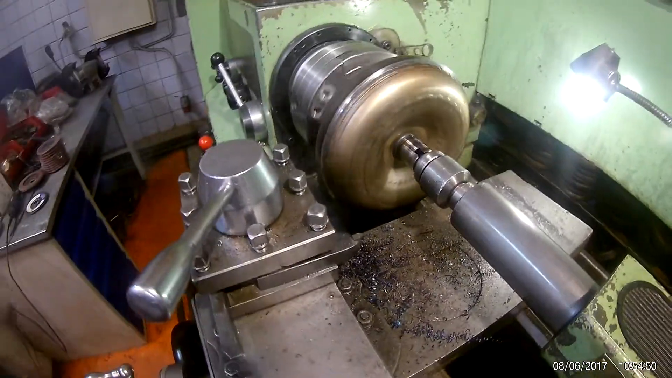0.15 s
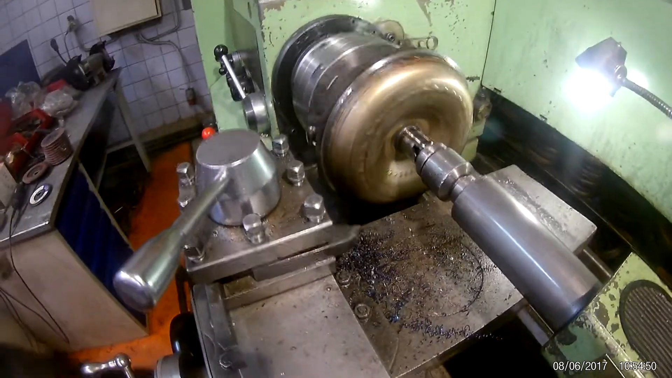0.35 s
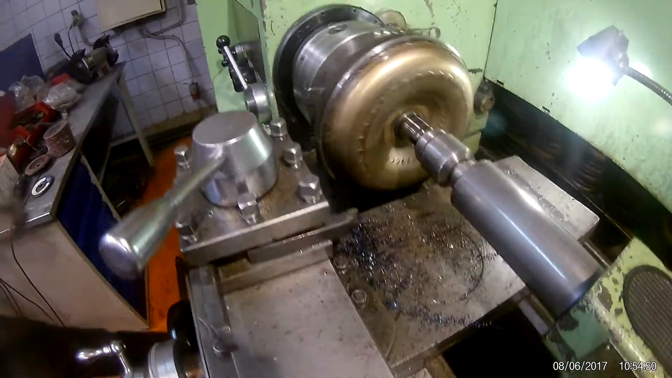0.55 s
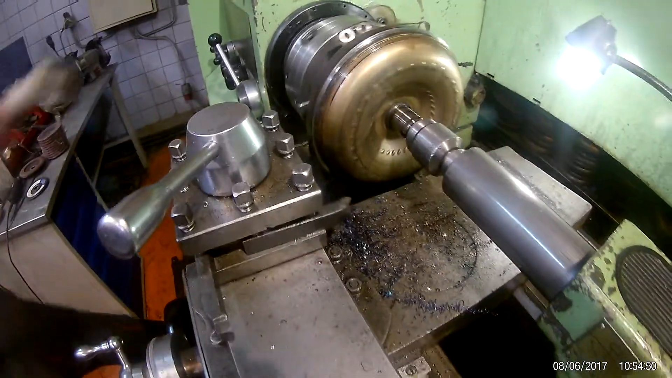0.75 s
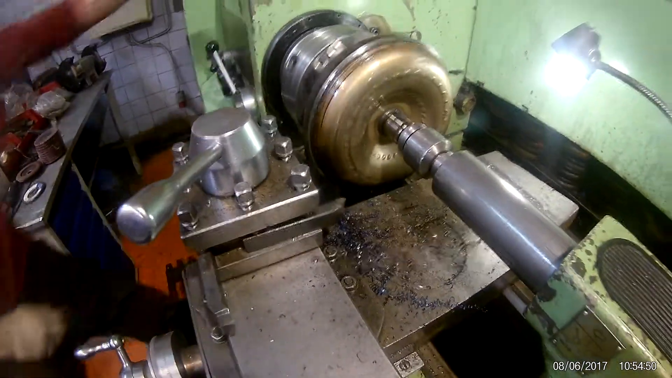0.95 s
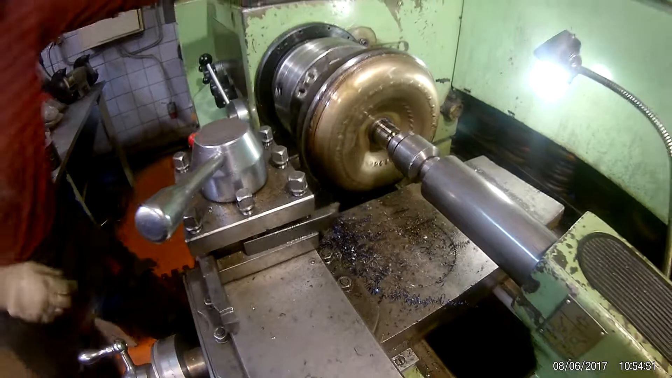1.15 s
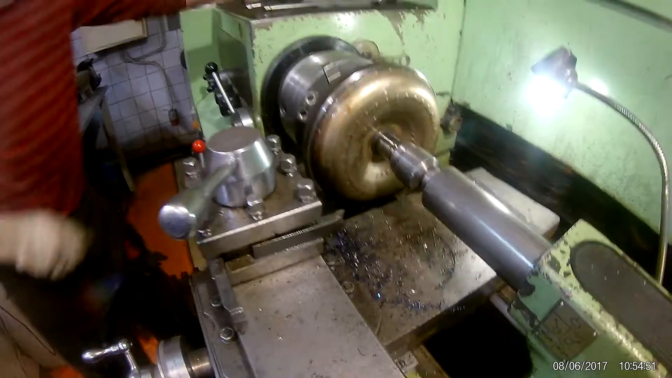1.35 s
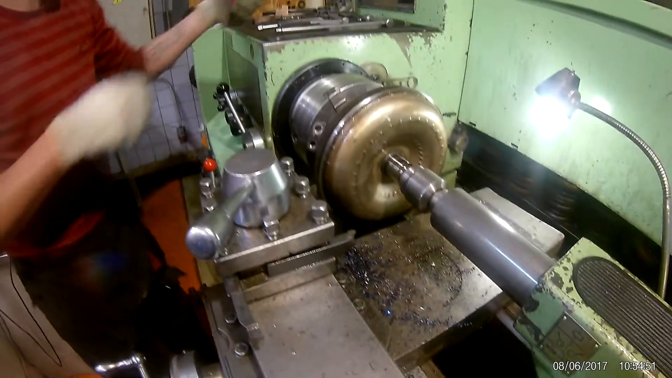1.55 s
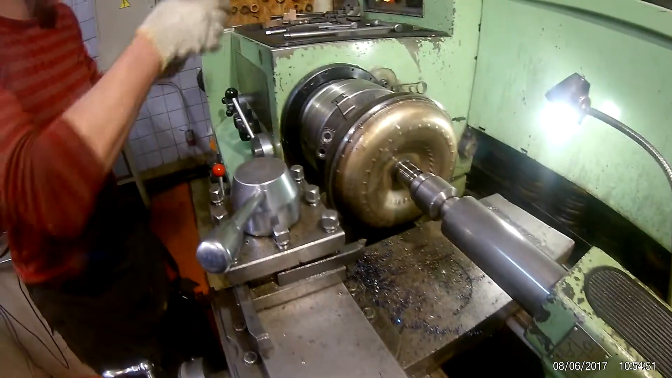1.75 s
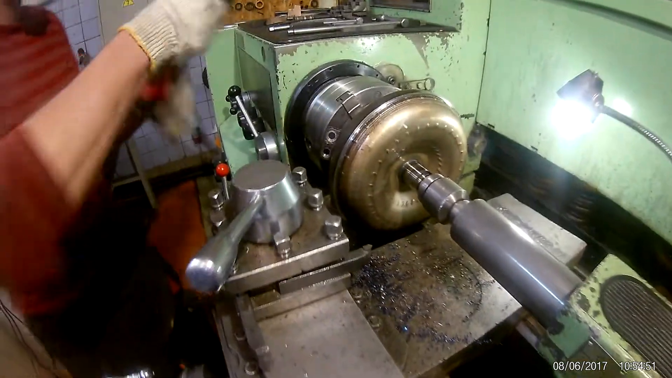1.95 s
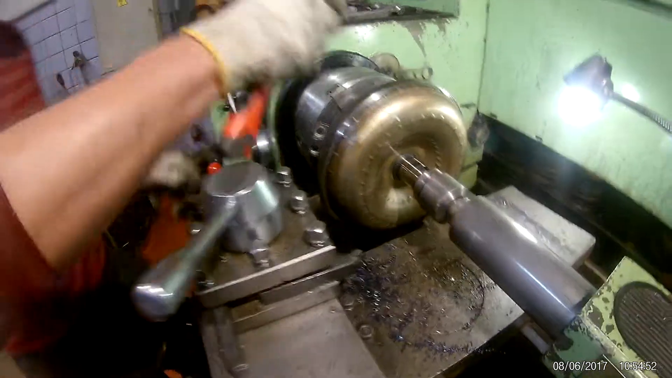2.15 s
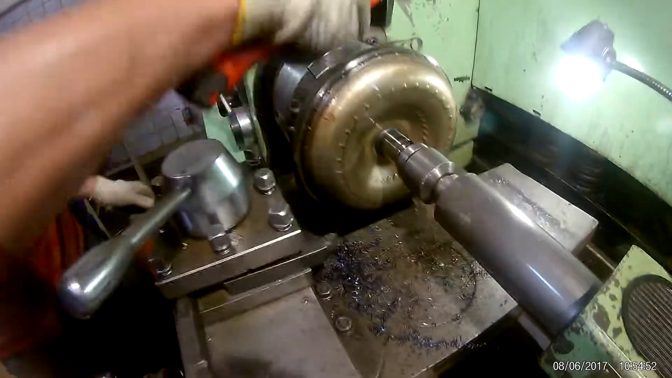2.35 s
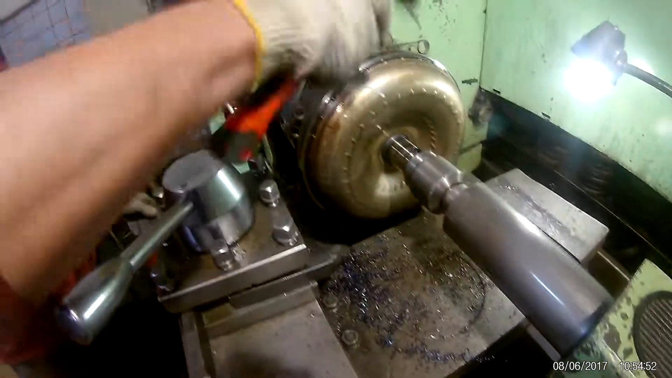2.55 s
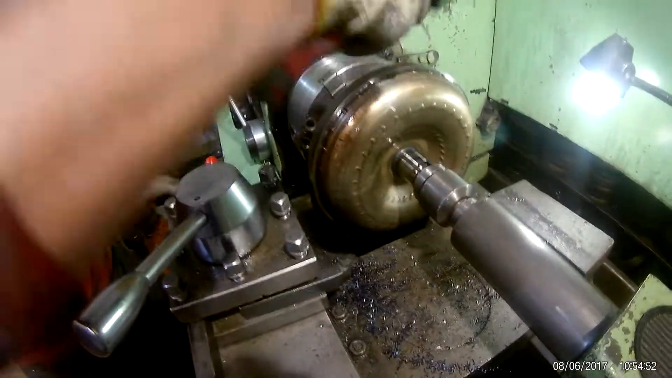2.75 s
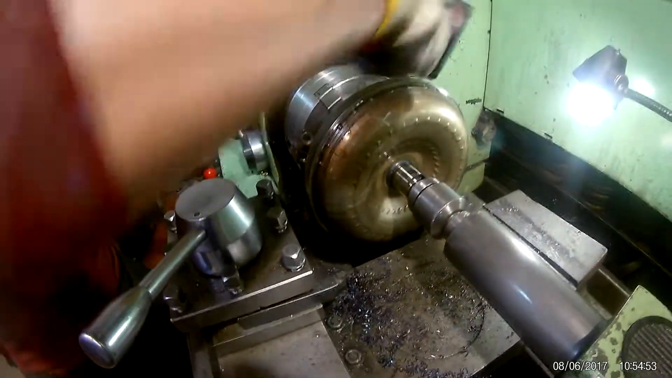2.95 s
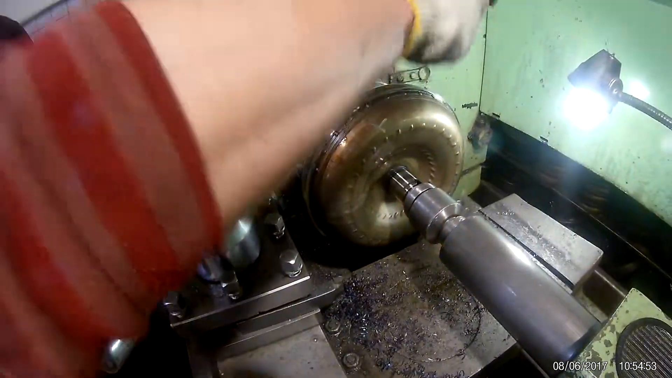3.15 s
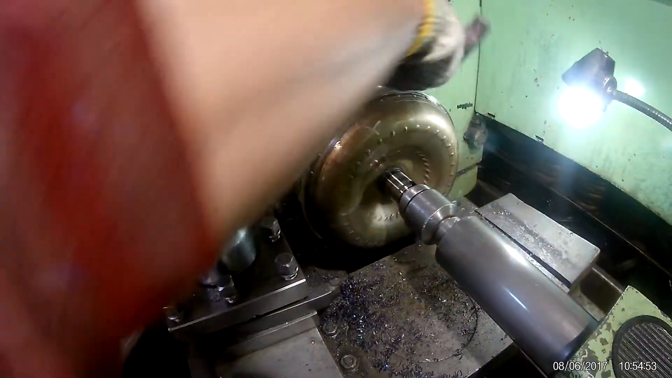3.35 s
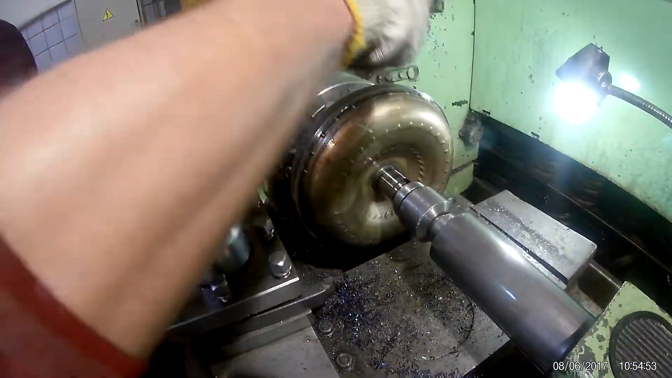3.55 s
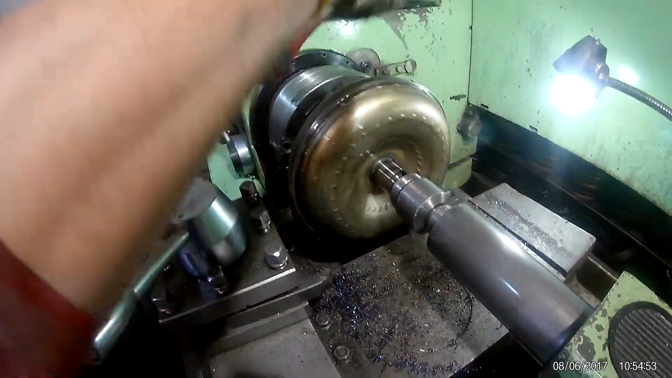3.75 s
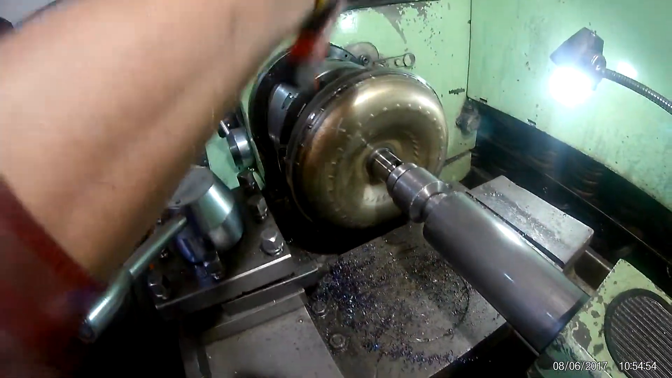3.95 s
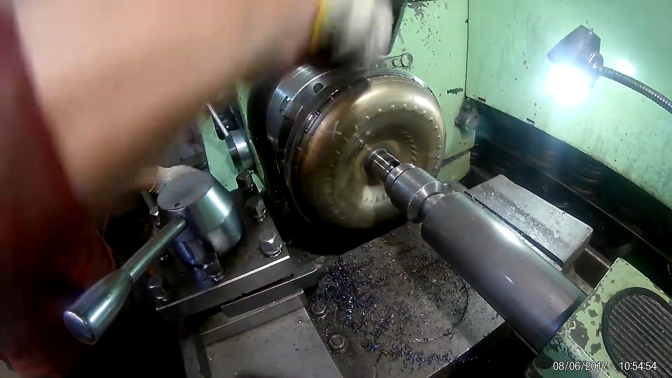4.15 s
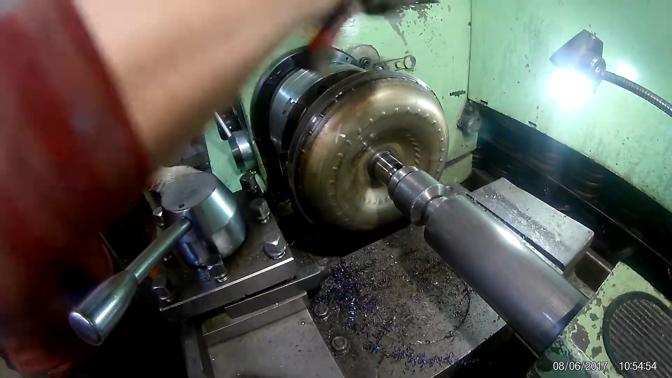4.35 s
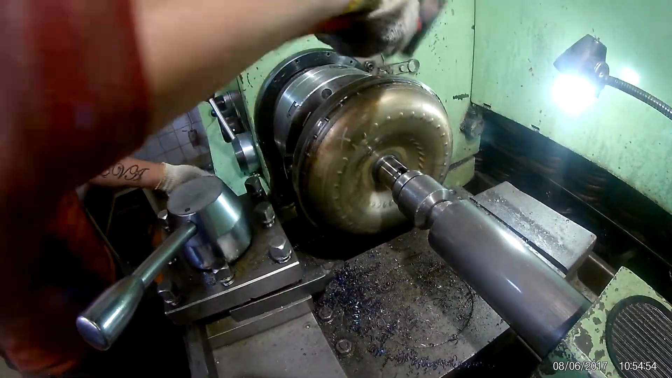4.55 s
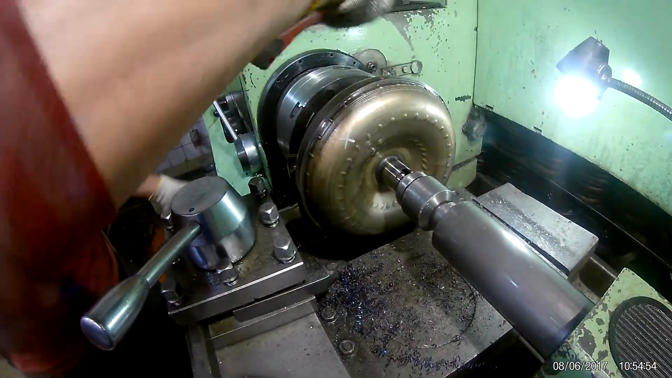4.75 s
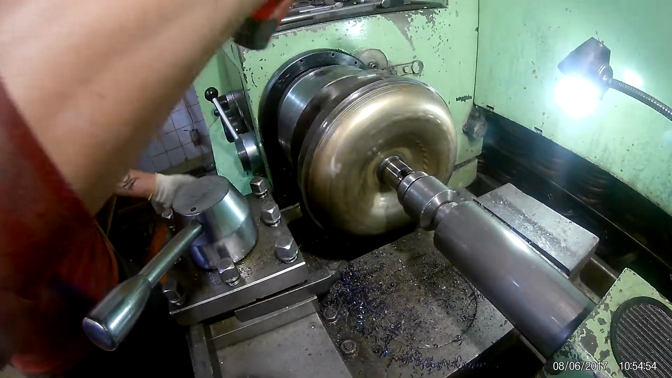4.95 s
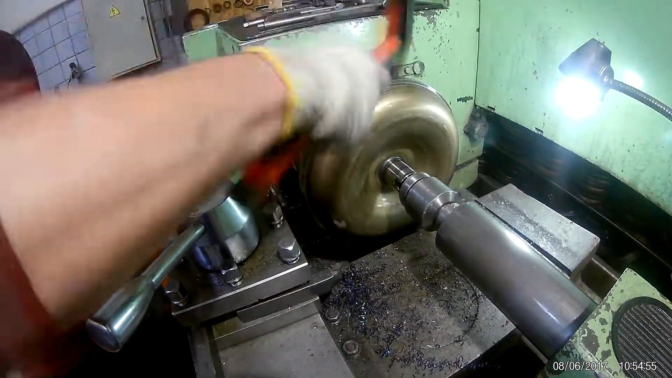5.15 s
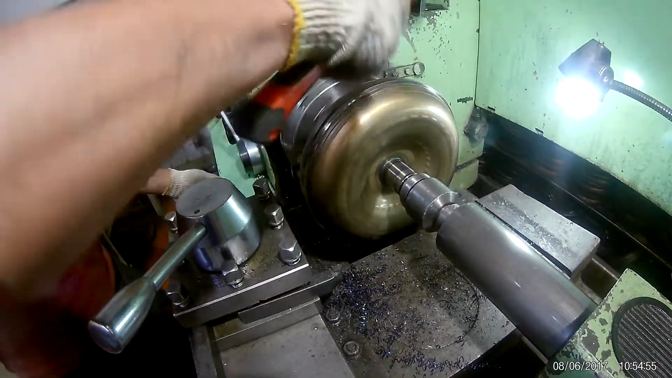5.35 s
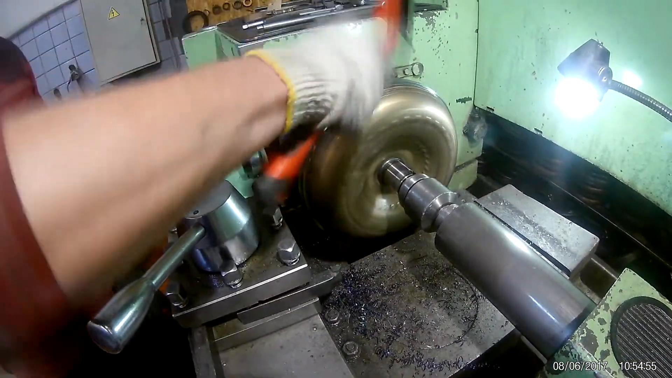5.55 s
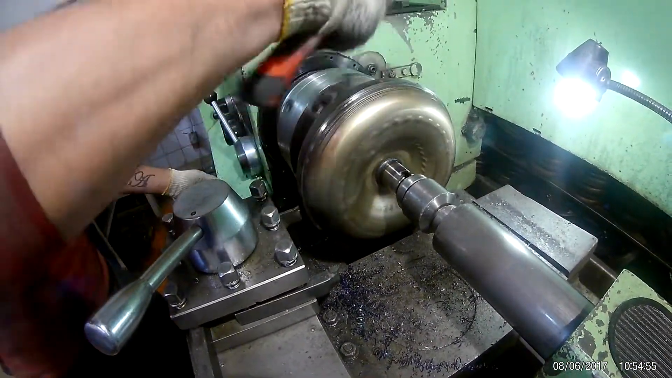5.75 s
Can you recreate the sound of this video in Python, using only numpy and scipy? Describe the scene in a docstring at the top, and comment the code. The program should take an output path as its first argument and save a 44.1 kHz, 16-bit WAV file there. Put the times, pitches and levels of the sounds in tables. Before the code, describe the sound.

Eight loud hammer blows clang on a steel shell, four and then two pairs, over the drone of a running lathe.

```python
"""A metal lathe runs in a small workshop, its gears whining over a rough drone.
A draught brushes the microphone as someone steps up, and tools and loose parts knock lightly.
Then eight hammer blows land on the steel shell that turns in the lathe's chuck (its clamp).
Each blow cracks and sets shell, lathe and room ringing, and the small, close microphone overloads."""
import sys
import numpy as np
from scipy import signal
from scipy.fft import rfft, irfft
from scipy.io import wavfile

SR = 44100
rng = np.random.default_rng(int(sys.argv[2]) if len(sys.argv) > 2 else 0)


def output_pcm(signal):
    """Save a mono or channel-first signal as 16-bit PCM at the path in sys.argv[1].

    Samples are clipped to [-1, 1] before scaling.
    """
    pcm = np.clip(np.atleast_2d(signal).T, -1, 1) * 32767
    wavfile.write(sys.argv[1], SR, np.round(pcm).astype(np.int16))


N = 255339
TIME = np.arange(N) / SR


def undb(db):
    """Turn decibels into a number to multiply by."""
    return 10 ** (np.asarray(db) / 20)


def unit(x):
    """Scale a signal to an average (rms) level of 1."""
    return x / np.sqrt(np.mean(x ** 2))


def along(points, hz):
    """Read between (Hz, value) points, giving each octave equal space."""
    f, value = np.transpose(points)
    return np.interp(np.log(np.maximum(hz, 1)), np.log(f), value)


def noise(points, size=N):
    """Noise of level 1, its lows and highs shaped by (Hz, dB) points."""
    hz = np.fft.rfftfreq(size, 1 / SR)
    return unit(irfft(rfft(rng.standard_normal(size)) * undb(along(points, hz)), size))


def colour(x, points, size=1024):
    """Turn the lows and highs of x up or down by (Hz, dB) points."""
    cepstrum = irfft(np.log(undb(along(points, np.fft.rfftfreq(size, 1 / SR)))))
    # folding makes the filter ring after a sound, never before it
    cepstrum[1:size // 2] *= 2
    cepstrum[size // 2 + 1:] = 0
    return signal.fftconvolve(x, irfft(np.exp(rfft(cepstrum))))[:len(x)]


def wander(rate_hz, size=N):
    """A smooth random wobble, typically 1 away from zero."""
    hz = np.fft.rfftfreq(size, 1 / SR)
    return unit(irfft(rfft(rng.standard_normal(size)) * np.exp(-(hz / rate_hz) ** 2), size))


def fade(t, fade_s):
    """Die away by 60 dB in fade_s seconds, the fade time."""
    return np.exp(-np.log(1000) * t / fade_s)


def add(out, start_s, x):
    """Mix x into out from start_s on."""
    i = int(start_s * SR)
    out[i:i + len(x)] += x[:N - i]


def machine_tone(hz, db, flutter, clock, flutter_hz=9):
    """A tone that follows the lathe's speed; uneven teeth shake its level and pitch."""
    shake = 1 + flutter * (wander(flutter_hz) + 1j * wander(flutter_hz)) / np.sqrt(2)
    return undb(db) * unit(np.real(shake * np.exp(2j * np.pi * hz * clock)))


# The drone's lows and highs. Each row: frequency in Hz, relative level in dB.
DRONE_COLOUR = [(20, -5), (85, -9), (120, -0.5), (170, 3.5), (230, -3.5), (420, -1.5), (520, 1.5),
                (640, -0.5), (780, 7), (900, 0), (1150, -15), (2100, -18.5), (4000, -23), (7000, -32.5)]

def drone(level_db=-31, throb_db=-0.5, throb_hz=25):
    """Bearings, belt and gear oil make a rough noise that throbs a little."""
    return noise(DRONE_COLOUR) * undb(level_db + throb_db * wander(throb_hz))


# Gear tones. Each row: multiple of the rate at which teeth meet, level in dB, amount of flutter.
GEAR_TONES = [(1, -33.5, 0.11), (3, -39, 0.93), (4, -50, .5)]

def gears(clock, teeth_hz=261.1, turns_per_s=7.9, whine_db=-40, swell_at_s=1.5, swell_db=7.5):
    """Meeting teeth hum; a whine at twice their rate swells once."""
    hum = sum(machine_tone(round(k) * teeth_hz, db, flutter, clock) for k, db, flutter in GEAR_TONES)
    width_s = np.where(TIME < swell_at_s, .3, .8)  # quick rise, slow fall
    swell = np.exp(-((TIME - swell_at_s) / width_s) ** 2)
    whine = machine_tone(2 * teeth_hz, whine_db + swell_db * swell, flutter=0.23, clock=clock)
    squeeze = np.sin(2 * np.pi * 2 * turns_per_s * clock)  # an oval gear presses tighter twice a turn
    return hum * (1 + 0.25 * squeeze) + whine * (1 + 0.45 * squeeze)


# Tones of the motor and other shafts. Each row: pitch in Hz, level in dB, amount of flutter.
SHAFT_TONES = [(124.4, -44.5, 0.97), (175, -38.5, 0.3), (189.2, -42, 0.74), (545, -42.5, 0.51),
               (607, -55.5, 0.46), (854, -46, .7), (959, -50.5, 0.54)]

def lathe(speed_drift=0.00081):
    """Gears and shafts drift in speed together, over the drone."""
    clock = TIME + np.cumsum(speed_drift * wander(3)) / SR
    gear_sound = gears(clock)
    shafts = sum(machine_tone(hz, db, flutter, clock) for hz, db, flutter in SHAFT_TONES)
    return gear_sound + shafts + drone()


# The gust's lows and highs. Each row: frequency in Hz, relative level in dB.
GUST_COLOUR = [(15, -4.5), (32, 1), (60, -4), (120, -10), (300, -17), (600, -12.5), (1200, -23),
               (4000, -42), (8000, -73)]

def draught(start_s=.785, rise_s=.045, hold_s=.085, fade_s=1.3, level_db=-26, rumble_hz=75):
    """Air stirred by a passing body buffets the microphone; the rush dies before the rumble."""
    age = TIME - start_s
    speed = np.clip(age / rise_s, 0, 1) * fade(np.maximum(age - rise_s - hold_s, 0), fade_s)
    air = noise(GUST_COLOUR) * undb(level_db + 1.5 * wander(rate_hz=14))
    rumble = signal.sosfiltfilt(signal.butter(2, rumble_hz, fs=SR, output="sos"), air)
    rush = air - rumble
    return rumble * speed + rush * speed ** 1.6


# Small knocks. Each row: start in seconds, level in dB, pitch in Hz.
TOOL_KNOCKS = [(.082, -39, 3220), (.8336, -21, 575), (3.4033, -17.5, 796), (3.9405, -28.5, 700)]

def knocks(fade_s=0.055):
    """Tools and loose parts tap lightly: a short ping over a dull rattle."""
    out, t = np.zeros(N), np.arange(SR // 2) / SR
    for start_s, db, hz in TOOL_KNOCKS:
        rattle = noise([(hz / 2, -20), (hz, 0), (hz * 2, -20), (hz * 10, -60)], len(t))
        ping = np.sin(2 * np.pi * hz * t)
        add(out, start_s, undb(db) * fade(t, fade_s) * (rattle + ping))
    return out


# The workshop's blur of echoes. Each row: frequency in Hz, relative level in dB, fade time in seconds.
ROOM_ECHOES = [(58, -37.5, 0.97), (113, -1, 1), (182, 0, 1), (210, -13, 0.99), (370, -5, 0.68),
               (543, 4, 0.78), (776, 4.5, 0.76), (1180, -6.5, 0.77), (2220, -13.5, 0.89),
               (3220, -15.5, 0.87), (7340, -33.5, 0.79)]
# Notes trapped between the walls. Each row: pitch in Hz, relative level in dB, fade time in seconds.
WALL_NOTES = [(153.7, -3, 0.62), (165.1, -2, 0.43), (193, -10.5, 1), (561, -2, .6), (770, -7.5, 0.99)]

def room_ring(t, echo_rise_s=0.0035, notes_rise_s=0.0058, notes_db=-4, sweep_hz=575, climb_hz_per_s=1400):
    """Echoes die away band by band, over ringing wall notes and one rising tone."""
    spectrum = rfft(noise([(f, db) for f, db, _ in ROOM_ECHOES], len(t)))
    hz = np.fft.rfftfreq(len(t), 1 / SR)
    centres_hz = np.geomspace(60, 8000, 20)
    fade_times = along([(f, fade_s) for f, _, fade_s in ROOM_ECHOES], centres_hz)
    bands = (irfft(spectrum * np.interp(hz, centres_hz, pick), len(t))
             for pick in np.eye(len(centres_hz)))
    echoes = sum(band * fade(t, fade_s) for band, fade_s in zip(bands, fade_times))
    # between square walls the echoes arrive ever closer together, so their pitch climbs
    cycles = (sweep_hz + climb_hz_per_s * t / 2) * t
    roughness = 0.62 * wander(40, len(t))
    sweep = undb(-3) * fade(t, 0.57) * np.sin(2 * np.pi * cycles + roughness)
    notes = sum(undb(db) * fade(t, fade_s) * np.sin(2 * np.pi * f * t) for f, db, fade_s in WALL_NOTES)
    notes *= undb(notes_db) * (1 - np.exp(-t / notes_rise_s))
    return (echoes + sweep) * (1 - np.exp(-t / echo_rise_s)) + notes


# Notes of the shell clamped on the lathe. Each row: pitch in Hz, fade time in seconds,
# relative level in dB when struck at place 0, the same at place 1.
SHELL_NOTES = [(325, 0.083, -12.5, -14), (420.3, 0.097, -18.5, -10), (493.8, 0.11, 3.5, -3),
               (595.6, 0.15, -22.5, -3.5), (665.5, 0.098, -10.5, -11), (797, 0.082, -9, -5.5),
               (854.7, .13, -1, -7.5), (915, 0.17, 1.5, -17), (997.4, 0.07, 4.5, -14.5),
               (1038, 0.09, -3.5, -9.5), (1159, 0.051, -16, -12.5), (1310, 0.086, -13, -20),
               (1430, 0.035, -18, -14), (1738, 0.075, -17.5, -15.5), (1898, 0.094, -16.5, -15.5),
               (2300, 0.029, 0.5, -7.5), (2890, 0.052, -9, -14), (4160, 0.027, -21.5, -19.5)]

def shell_ring(t, place, scatter_db=1.5, detune=0.0034):
    """The steel rings with many notes at once; where it is struck sets their balance."""
    hz, fade_s, db_at_0, db_at_1 = np.transpose(SHELL_NOTES)[:, :, None]
    level_luck, pitch_luck = rng.standard_normal((2, len(SHELL_NOTES), 1))
    sign = (-1) ** np.arange(len(SHELL_NOTES))[:, None]  # neighbouring notes swing against each other
    gains = sign * undb(db_at_0 + place * (db_at_1 - db_at_0) + scatter_db * level_luck)
    notes = np.cos(2 * np.pi * hz * (1 + detune * pitch_luck) * t)
    return np.sum(gains * fade(t, fade_s) * notes, axis=0)


# The crack: crowded, short-lived notes, played as noise. Each row: frequency in Hz, relative level in dB.
CRACK_COLOUR = [(100, -35), (350, -16.5), (600, -1.5), (1000, -1.5), (1400, -9), (2300, -12.5),
                (4000, -8.5), (7000, -16)]
# Hammer blows. Each row: start in seconds, force in dB, place on the shell from 0 to 1,
# extra crack in dB, extra room sound in dB.
HAMMER_BLOWS = [(2.2477, -1, 0.38, 4, -1.5), (2.5763, -4.5, 0.1, 9.5, 0), (2.8893, -0.5, 0.39, 9.5, -2.5),
                (3.2332, 2, 0.86, 8, -2), (4.0893, 1, 0.66, 9.5, 1), (4.4567, 1.5, 0.82, 9, 1),
                (5.1596, 5, 1, 5.5, -1.5), (5.5637, 4.5, 0.92, 6, -2)]

def hammer(shell_db=1, crack_db=-1, room_db=-11, rise_s=0.00044, wall_delay_s=0.019, wall_db=-13):
    """Each blow rings the shell, cracks sharply and fills the room."""
    out, t = np.zeros(N), np.arange(SR) / SR
    for start_s, force_db, place, extra_crack_db, extra_room_db in HAMMER_BLOWS:
        ring = shell_ring(t, place)
        crack = undb(crack_db + extra_crack_db) * noise(CRACK_COLOUR, len(t)) * fade(t, 0.031)
        room = undb(room_db + extra_room_db) * room_ring(t)
        contact = undb(force_db) * (1 - np.exp(-t / rise_s))
        add(out, start_s, contact * (undb(shell_db) * ring + crack + room))
        add(out, start_s + wall_delay_s, contact * undb(wall_db) * ring)  # first echo off the tiled wall
    return out


def scene():
    """Lathe, hammer and small noises meet at one microphone."""
    return (lathe() + hammer() + knocks() + draught())[None]


# The microphone's opening, whose hollows favour some pitches. Each row: frequency in Hz, gain in dB.
MIC_OPENING = [(1000, -0.5), (2200, -0.5), (2550, -10), (3100, -11), (3550, -21.5), (4150, -13),
               (4750, -26), (5400, -16.5), (6000, -23), (6800, -10), (7800, -14)]
# How the digital converter passes treble. Each row: frequency in Hz, gain in dB.
CONVERTER_TREBLE = [(6000, 0), (7200, -8), (8000, -15), (9400, -0.5), (12000, 1), (15500, -16)]

def record(dry, band_hz=7400, channel_hz=16000, leak_db=-7, clip_hardness=10, hiss_db=-78, top_hz=15800):
    """The microphone colours the sound, a narrow channel cuts the treble, and loud peaks overload."""
    x = colour(dry[0], MIC_OPENING)
    x = signal.sosfilt(signal.butter(12, band_hz, fs=SR, output="sos"), x)
    # the top of the band leaks through, mirrored about half the channel's rate
    edge = signal.sosfilt(signal.butter(8, band_hz, "high", fs=SR, output="sos"), x)
    x = x + undb(leak_db) * 2 * edge * np.cos(2 * np.pi * channel_hz * TIME)
    x = x / (1 + np.abs(x) ** clip_hardness) ** (1 / clip_hardness)  # flatten the peaks
    x = .98 * colour(x, CONVERTER_TREBLE)
    x = x + undb(hiss_db) * rng.standard_normal(N)
    return signal.sosfilt(signal.ellip(8, .1, 70, top_hz, fs=SR, output="sos"), x)[None]


dry = scene()
out = record(dry)
output_pcm(out)
```